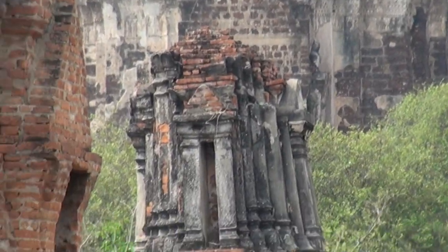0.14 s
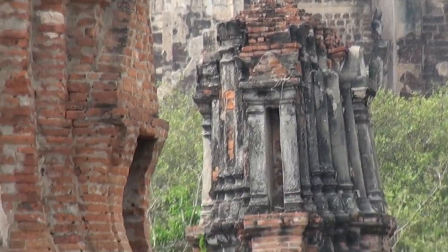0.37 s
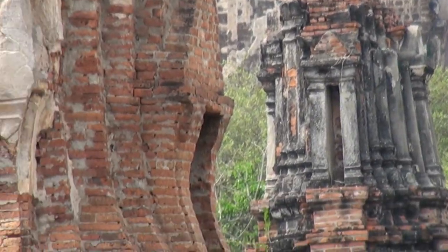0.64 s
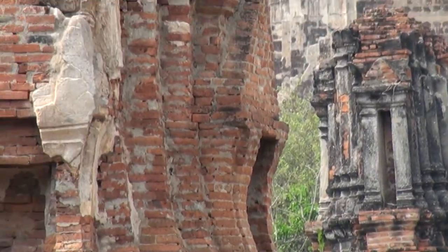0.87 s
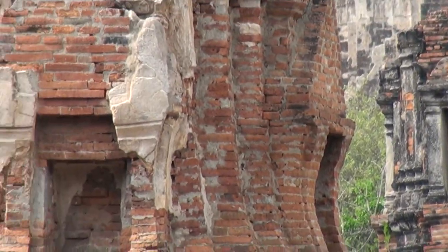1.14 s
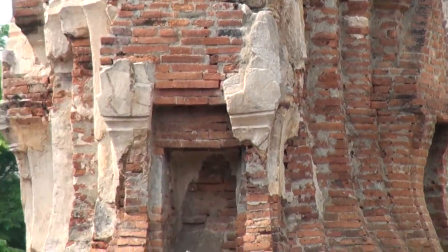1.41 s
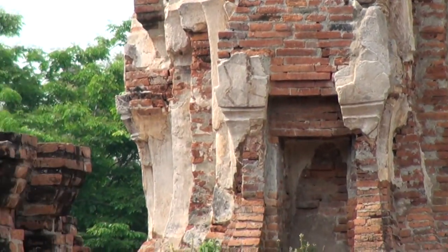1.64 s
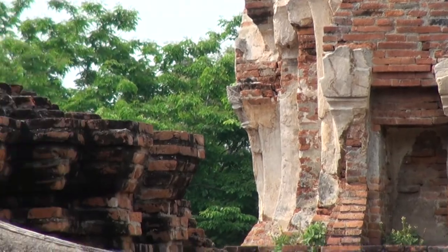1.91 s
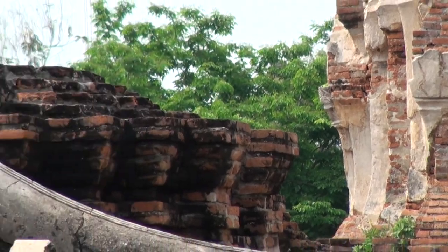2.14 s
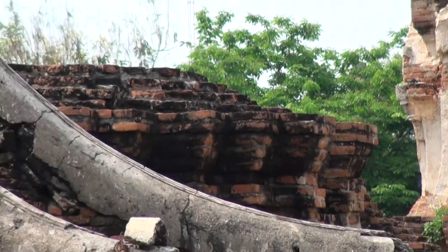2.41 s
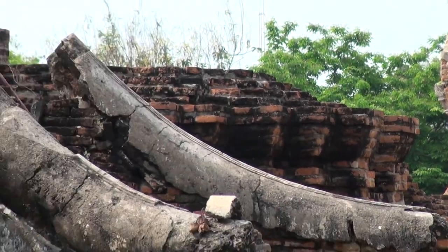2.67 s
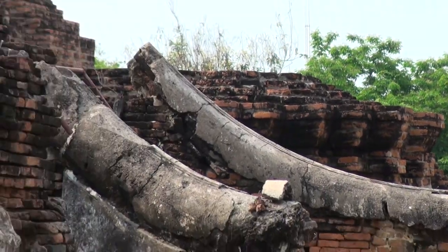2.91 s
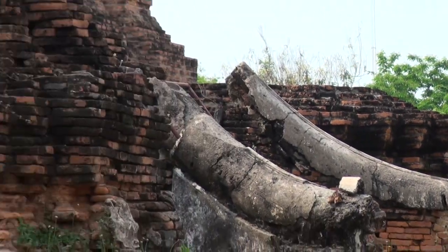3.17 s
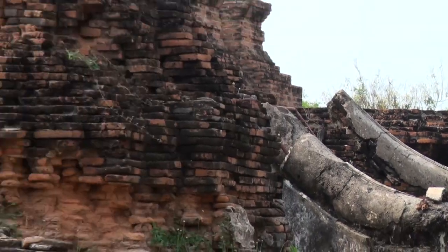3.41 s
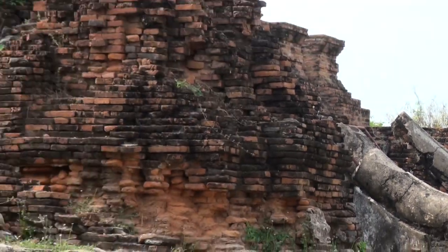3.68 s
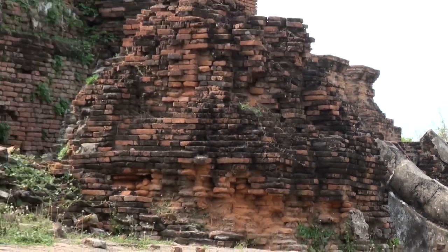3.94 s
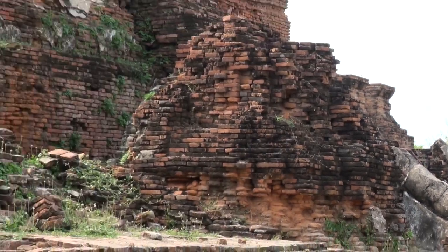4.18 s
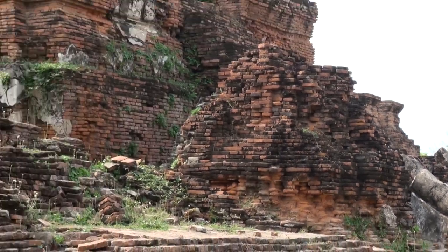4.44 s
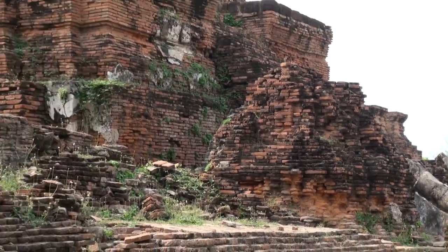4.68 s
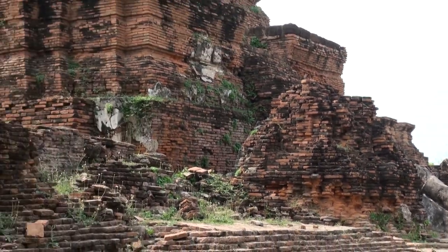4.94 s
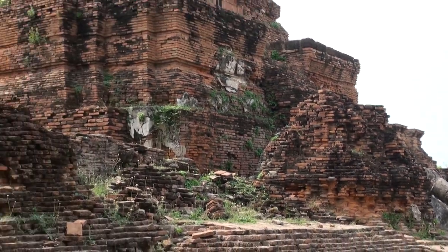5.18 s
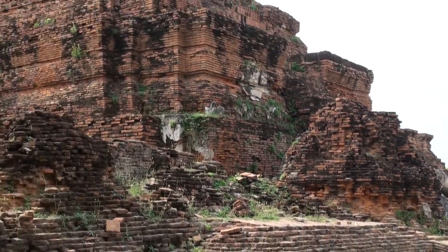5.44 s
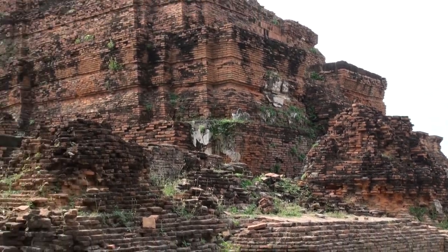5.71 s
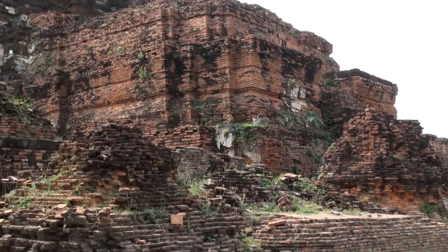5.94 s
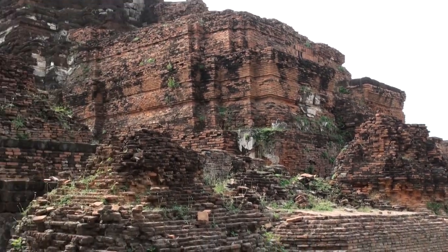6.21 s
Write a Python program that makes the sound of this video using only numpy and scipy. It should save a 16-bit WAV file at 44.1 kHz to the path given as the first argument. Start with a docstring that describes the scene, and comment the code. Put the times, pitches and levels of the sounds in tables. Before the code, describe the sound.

A quiet open-air place among brick ruins. Throughout, a very low breeze rumble swells unevenly on the microphone, with soft stereo hiss, a blurred wash of distant birds and faraway traffic that grows slightly; low engine tones waver, more noticeable from about 2.8 s. Faint buzzy warbles open, with rough little chirps at 0.5-0.7 s. A near bird sweeps upward at 0.9-1.0 s, then a fast trill falls from high and settles on a repeated pitch, 1.2-1.5 s. Harsh chirps cluster around 1.7 s. A short clear whistle peaks at 2.4 s. Distant warbles and chirps come at 3.0-3.7 s, leading into a louder whistle that leaps up and swoops down by 3.8 s. Sparse faint chips follow at 4.3 and 5.0 s. A louder rising call rings at 5.6 s, then dry ticks at about 5.85, 6.0 and 6.2 s. Walls add dull echoes and short tails.

```python
"""Birds call among brick ruins: two rising harmonic calls, two clear whistles, a falling trill and fainter
notes far off. Their voices are gliding tones and bands of noise, and the walls throw back echoes without their
low notes, and a tail. Distant traffic, made of shaped noise, drones and slowly grows; engines hum as low tones
that waver. A breeze rumbles on the microphone, under a soft hiss that differs between the channels."""
import sys
import numpy as np
from scipy import signal
from scipy.fft import rfft, irfft, next_fast_len
from scipy.io import wavfile
from scipy.ndimage import uniform_filter1d, map_coordinates

SR = 44100
rng = np.random.default_rng(int(sys.argv[2]) if len(sys.argv) > 2 else 0)


def undo_db(level):
    """Turn decibels back into plain size, where 20 dB means ten times bigger."""
    steps = np.asarray(level, float) / 20
    return 10 ** steps


def wrap_up_sound(samples):
    """Save the sound to the file named by the first command line argument, as 16-bit audio."""
    columns = np.atleast_2d(samples).T
    # keep every value between -1 and 1, then stretch to whole-number steps
    tamed = np.clip(columns, -1, 1)
    steps = np.round(tamed * 32767).astype(np.int16)
    wavfile.write(sys.argv[1], SR, steps)


N = 279241
TIME = np.arange(N) / SR


def unit(x):
    """Scale to rms 1."""
    return x / np.sqrt(np.mean(x ** 2) + 1e-20)


def along(points, hz):
    """Read (frequency, value) points on a log frequency axis."""
    f, v = np.transpose(points)
    return np.interp(np.log(hz + 1), np.log(f + 1), v)


def curves(rows, t=TIME):
    """Give one value per instant for each column after the time."""
    s, *cols = np.transpose(rows)
    return [np.interp(t, s, c) for c in cols]


def wobble(rate, size=N):
    """A smooth random curve with `rate` random knots a second."""
    knots = rng.standard_normal(int(size * rate / SR) + 4)
    return map_coordinates(knots, [np.arange(size) * rate / SR])


def span(start, length):
    """Times of the samples of one note (s)."""
    return start + np.arange(round(length * SR)) / SR


def add(track, start, sound, edge):
    """Lay a sound on a track, fading in and out over `edge` seconds."""
    k = np.arange(len(sound))
    fade = np.clip(np.minimum(k, k[::-1]) / (edge * SR), 0, 1)
    piece = track[round(start * SR):][:len(sound)]
    piece += (sound * fade)[:len(piece)]


def turns(hz):
    """Phase of a gliding tone, the glide smoothed over 2 ms."""
    return 2 * np.pi * np.cumsum(uniform_filter1d(hz, size=SR // 500)) / SR


def tone(hz, db):
    """A gliding sine whose rms follows a level in dB."""
    return np.sqrt(2) * undo_db(db) * np.sin(turns(hz))


def band(size, hz, width_hz):
    """Noise of rms 1 in a bell-shaped band."""
    f = np.fft.rfftfreq(size, 1 / SR)
    bell = np.exp(-2 * ((f - hz) / width_hz) ** 2)
    return unit(irfft(rfft(rng.standard_normal(size)) * bell, size))


# how far the left-right difference lies below the sum: (frequency [Hz], level [dB])
SIDE_LEVEL = [(30, -33), (80, -25), (170, -19), (350, -18), (700, -25), (1300, -28), (3000, -24)]


def rush(spectrum, patchy_db, side_level=SIDE_LEVEL):
    """Stereo noise of rms 1: a spectrum sets its colour, and smooth patches of random gain roughen it."""
    z = signal.stft(rng.standard_normal((2, N)), nperseg=512)[2]
    field = rng.standard_normal(z.shape[1:])
    field = uniform_filter1d(field, size=6, axis=0)
    field = uniform_filter1d(field, size=14, axis=1)
    pair = signal.istft(z * undo_db(patchy_db * unit(field)), nperseg=512)[1][:, :N]
    m = next_fast_len(N)
    hz = np.fft.rfftfreq(m, 1 / SR)
    balance = [np.ones(len(hz)), undo_db(along(side_level, hz))]
    mid, side = irfft(rfft(pair, m) * undo_db(along(spectrum, hz)) * balance, m)[:, :N]
    return unit(np.array([mid + side, mid - side]))


# strength of the breeze: (time [s], level [dB])
BREEZE_LEVEL = [(0, -26), (.37, -26), (.62, -27), (1.23, -23.5), (2.08, -25), (2.5, -31.5), (3.1, -23),
                (3.25, -29.5), (3.7, -23), (3.93, -27), (4.1, -21.5), (5.06, -26.5), (5.34, -19),
                (5.57, -31), (5.73, -24.5), (6.33, -28.5)]
# colour of the breeze, relative: (frequency [Hz], density [dB per Hz])
BREEZE_COLOUR = [(3, -62), (5, 0.5), (12, 3), (23, -7), (30, -6), (37, -21.5), (50, -47), (80, -120)]
# colour of the low rumble, relative: (frequency [Hz], density [dB per Hz])
RUMBLE_COLOUR = [(15, -120), (26, -11), (36, 1), (52, -1), (64, -2.5), (80, -13), (100, -11.5), (115, -18),
                 (150, -60), (250, -120)]


def breeze_and_rumble():
    """Very low noise swells as the breeze meets the microphone; a rumble follows it more gently."""
    breeze_db, = curves(BREEZE_LEVEL)
    rumble_db = -35.5 + 0.26 * (breeze_db - breeze_db.mean())
    breeze = undo_db(breeze_db) * rush(BREEZE_COLOUR, patchy_db=0.7)
    return breeze + undo_db(rumble_db) * rush(RUMBLE_COLOUR, patchy_db=0.87)


# colour of the engine drone, relative: (frequency [Hz], density [dB per Hz])
DRONE_COLOUR = [(62, -43), (105, -13.5), (160, -2.5), (210, -6), (300, -8.5), (400, -12), (520, -13.5),
                (680, -23), (1140, -120)]
# colour of the tyre noise, relative: (frequency [Hz], density [dB per Hz])
TYRE_COLOUR = [(330, -23), (560, -4), (813, -0.5), (2600, -13.5), (3380, -22.5), (5720, -120)]


def traffic():
    """Far engines and tyres, as two bands of noise; both grow as traffic nears, the tyres faster."""
    nearing_db = 0.5 * TIME  # dB per second
    drone = undo_db(-48.5 + 0.25 * nearing_db) * rush(DRONE_COLOUR, patchy_db=-0.14)
    tyres = undo_db(-51 + nearing_db) * rush(TYRE_COLOUR, patchy_db=0.8)
    return drone + tyres


# colour of the blurred birds, relative: (frequency [Hz], density [dB per Hz])
CHATTER_COLOUR = [(1120, 3.5), (1900, -11.5), (2480, -5.5), (3790, -4), (4130, -4), (5160, -9), (8000, -15),
                  (10400, -54), (17600, -120)]


def chatter():
    """Distant birds blur into a band of noise that wavers slightly in level."""
    return undo_db(-54 + 0.7 * wobble(2.5)) * rush(CHATTER_COLOUR, patchy_db=0.6)


# colour of the hiss, relative: (frequency [Hz], density [dB per Hz])
HISS_COLOUR = [(100, -20), (3000, -3), (9000, 2), (16000, 1)]


def hiss():
    """Steady bright noise, largely different in each channel."""
    return undo_db(-59) * rush(HISS_COLOUR, patchy_db=1.0, side_level=[(100, -3.5)])


# strength of the first engine: (time [s], level [dB])
HUM_LEVEL = [(0.0, -57), (1.74, -53), (1.83, -65), (2.2, -47), (2.5, -66), (2.82, -44), (3.37, -54.5),
             (3.75, -42.5), (4.21, -42), (4.32, -56), (4.71, -43.5), (4.83, -55.5), (6.08, -45),
             (6.33, -47.5)]
# a second, slower engine: (time [s], pitch [Hz], level [dB])
SLOW_ENGINE = [(2.9, 118.6, -64), (3.14, 117.3, -45), (3.48, 117, -51.5), (4.16, 120.3, -44.5),
               (4.4, 120.8, -65)]


def engine_hum():
    """Low firing tones from afar: one wavers in pitch and strength, a slower one in strength as it drifts."""
    db, = curves(HUM_LEVEL)
    hum = tone(132.1 + 2 * wobble(2) + 1.5 * wobble(10), db + 2 * wobble(8))
    start, end = SLOW_ENGINE[0][0], SLOW_ENGINE[-1][0]
    t = span(start, end - start)
    hz, db = curves(SLOW_ENGINE, t)
    add(hum, start, tone(hz, db + 1.5 * wobble(7.7, size=len(t))), edge=0.16)
    return hum


# echoes from rough walls: (delay [s], level [dB])
WALL_ECHOES = [(.004, -3.5), (.011, -15), (0.016, -35.5), (.025, -3.5), (.032, -5), (0.038, -22.5)]
# band that the crumbling brick sends back: (lowest [Hz], highest [Hz])
BRICK_BAND = [2600, 8700]
# how long the tail takes to fall by 60 dB: (frequency [Hz], time [s])
TAIL_TIME = [(1500, 0.28), (2300, 1), (3500, 0.58), (9000, 0.7)]


def ruins(x, walls_db, tail_db):
    """Direct sound, smeared wall echoes in a band from 2600 to 8700 Hz, and a diffuse tail that builds up, then
    dies at its own rate per pitch."""
    hz, t, z = signal.stft(rng.standard_normal(SR), SR, nperseg=256)
    decay = undo_db(-60 * t / along(TAIL_TIME, hz)[:, None])
    build_up = np.clip(t / 0.012, 0, 1)
    tail = signal.istft(z * decay * build_up, SR, nperseg=256)[1]
    walls = np.zeros(len(tail))
    for delay, db in WALL_ECHOES:
        smear = rng.standard_normal(SR // 125)  # bricks at many depths spread each echo over 8 ms
        add(walls, delay, undo_db(db) * smear / np.linalg.norm(smear), edge=0.00012)
    walls = signal.sosfilt(signal.butter(2, BRICK_BAND, "bandpass", fs=SR, output="sos"), walls)
    walls = walls * np.sqrt(SR / 2 / np.ptp(BRICK_BAND))  # make up for the energy the filter removes
    answer = undo_db(tail_db) * tail / np.linalg.norm(tail) + undo_db(walls_db) * walls
    answer[0] = 1  # the direct sound
    return signal.fftconvolve(x, answer)[:N]


def hoarse(hz, db):
    """A tone roughened by fast random changes of pitch and level."""
    rough_db = db + 1.5 * wobble(200, size=len(hz))
    return tone(hz * (1 + 0.016 * wobble(350, size=len(hz))), rough_db)


# pulsing warbles: (start [s], end [s], centre [Hz], width [Hz], level [dB])
WARBLES = [(.01, 0.372, 2800, 300, -61.5), (0.875, 1.22, 3040, 220, -62.5),
           (1.169, 1.255, 5250, 600, -61.5), (3.788, 3.89, 2495, 700, -56), (1.27, 1.317, 5850, 500, -64),
           (1.566, 1.656, 3100, 200, -58.5), (3.013, 3.142, 4340, 350, -64.5),
           (3.054, 3.11, 2900, 400, -53), (3.224, 3.56, 2780, 280, -60)]


def far_warbles():
    """Buzzy warbles smeared by distance: bands of noise that pulse 76 times a second."""
    out = np.zeros(N)
    for s, end, hz, width_hz, db in WARBLES:
        t = span(0, end - s)
        pulses = 1 + 0.31 * np.sin(2 * np.pi * 76 * t)
        add(out, s, undo_db(db) * unit(pulses * band(len(t), hz, width_hz)), edge=0.0041)
    return out


# gliding notes: (time [s], length [s], start [Hz], end [Hz], level [dB])
GLIDES = [(0.508, 0.053, 2500, 3130, -57), (.584, 0.013, 2600, 1950, -53),
          (0.602, 0.033, 4350, 2890, -56.5), (.592, .01, 3400, 2800, -55), (.598, .012, 2330, 1900, -55),
          (.612, .012, 3280, 2900, -54), (.632, 0.0071, 4200, 4050, -64), (0.615, 0.024, 2700, 1950, -53),
          (.647, 0.017, 2950, 2020, -50), (0.666, 0.025, 2760, 2160, -49.5),
          (1.701, 0.0039, 3120, 2600, -41), (1.706, 0.0097, 3030, 2900, -43),
          (1.703, 0.014, 4670, 3130, -50), (1.759, .027, 4000, 2200, -50), (1.783, .014, 3460, 2670, -52),
          (1.693, 0.0064, 2900, 4000, -53), (1.797, .012, 3080, 2300, -60), (1.8, 0.013, 2400, 2220, -62),
          (1.811, 0.0217, 3900, 3000, -57), (2.966, 0.043, 4600, 4680, -61),
          (3.019, 0.04, 3140, 2670, -52.5), (3.083, 0.043, 2930, 3170, -61),
          (3.075, 0.036, 2356, 2326, -50), (3.552, 0.0073, 3800, 3600, -56), (3.57, 0.015, 3790, 3750, -52),
          (3.605, 0.029, 3210, 2710, -47.5), (3.639, .015, 2890, 2800, -50), (3.657, .02, 2800, 2790, -48),
          (3.592, .017, 4780, 4830, -62), (3.68, 0.01, 4180, 4340, -45), (3.69, .006, 4400, 6800, -52),
          (2.995, .012, 4000, 3600, -60), (3.676, 0.033, 2120, 2420, -50), (5.315, 0.021, 3820, 3900, -65),
          (5.331, 0.01, 3200, 2900, -52), (5.531, .022, 2930, 2900, -58)]
# up-and-down notes: (time [s], length [s], top [Hz], level [dB])
ARCHED_NOTES = [(1.681, .011, 3950, -50), (1.736, 0.011, 3930, -47), (1.75, 0.02, 4150, -55)]


def far_notes():
    """Hoarse notes of other birds, gliding one way or arching up and down."""
    out = np.zeros(N)
    for s, length, start_hz, end_hz, db in GLIDES:
        u = span(0, length) / length
        hz = end_hz + (start_hz - end_hz) * (1 - u) ** 1.5  # moves fastest at its start
        add(out, s, hoarse(hz, db), edge=min(0.002, length / 4))
    foot_hz = 2730
    for s, length, top_hz, db in ARCHED_NOTES:
        u = span(0, length) / length
        add(out, s, hoarse(foot_hz + (top_hz - foot_hz) * np.sin(np.pi * u), db), edge=0.0016)
    return out


# harsh chips: (time [s], length [s], centre [Hz], width [Hz], level [dB])
HARSH_CHIPS = [(.572, .006, 4000, 4000, -54), (0.579, .09, 3280, 2200, -63),
               (1.698, 0.0067, 3300, 4400, -45), (1.705, 0.0076, 3780, 4000, -47),
               (1.693, .11, 3080, 2200, -58), (4.303, .0045, 5440, 6100, -50.5),
               (5.02, .0062, 5000, 7040, -55), (5.313, 0.029, 3420, 2800, -50),
               (5.6, .004, 2800, 4000, -48)]


def far_chips():
    """Harsh chips: bursts of broadband noise."""
    out = np.zeros(N)
    for s, length, hz, width_hz, db in HARSH_CHIPS:
        add(out, s, undo_db(db) * band(len(span(0, length)), hz, width_hz), edge=length / 4)
    return out


# short ticks: (time [s], start pitch [Hz], level [dB])
FALLING_TICKS = [(5.024, 3500, -49), (5.51, 3560, -43), (5.855, 4070, -42.5), (6.019, 4060, -43),
                 (6.179, 3940, -43.5)]


def far_ticks():
    """Each tick is a steep drop in pitch with a breathy puff of noise from halfway through."""
    out = np.zeros(N)
    tick_s, fall_hz, puff_s = 0.0055, 1350, 0.014
    for s, hz, db in FALLING_TICKS:
        add(out, s, hoarse(hz - fall_hz * span(0, tick_s) / tick_s, db), edge=tick_s / 4)
        puff = undo_db(db - 9.5) * band(len(span(0, puff_s)), 3300, width_hz=4200)
        add(out, s + tick_s / 2, puff, edge=puff_s / 4)
    return out


# thin steady notes high up: (time [s], length [s])
THIN_NOTES = [(5.847, .031), (5.882, .022), (5.909, .058)]


def far_thin_tone():
    """A faint, pure tone at 12170 Hz."""
    out = np.zeros(N)
    for s, length in THIN_NOTES:
        thin = np.sqrt(2) * undo_db(-67.5) * np.sin(2 * np.pi * 12170 * span(0, length))
        add(out, s, thin, edge=0.003)
    return out


# rising calls of a near bird: (time [s], pitch [Hz], effort [dB], beak closed [0-1])
RISING_CALLS = [
    [(.915, 1182, -53, 0), (.939, 1340, -46, 0.14), (.963, 1530, -35, 0.03), (.973, 1697, -45.5, 0.48),
     (.987, 1810, -46, .35), (.999, 2020, -54, 0.83), (1.005, 2080, -61.5, 0.98), (1.012, 2110, -62, 1),
     (1.02, 2000, -72, 1)],
    [(5.609, 1250, -50, 0), (5.614, 1266, -44.5, 0.1), (5.63, 1400, -43, 0.1), (5.648, 1548, -34.5, 0.17),
     (5.666, 1790, -29, 0.01), (5.68, 1887, -35, 0.2), (5.692, 1960, -35, 0.18), (5.706, 1893, -42.5, 0.2),
     (5.714, 1895, -47, 0.57), (5.722, 1860, -58, .4)],
]
# each call faces another way: (walls [dB], tail [dB])
RISING_ROOM = [(-15, -24), (-18, -10)]
# voice of each call: (share of pitch per step [fraction], upper harmonics at 1240 Hz [dB],
# their change per kHz of climb [dB], extra on harmonics 4-6 [dB])
RISING_VOICE = [(.008, 3, -18, -8), (.06, 1.5, -7, 0.5)]
# strength of harmonics 1-6 before throat and beak shape them: (level [dB])
OVERTONES = [0.5, 1, -11.5, -23, -20, -34]
# fixed resonances of the throat: (frequency [Hz], gain [dB])
THROAT_GAIN = [(1000, -1), (3000, -1), (4200, 3.5), (4700, 0.5), (5200, -3.5), (5800, 12.5), (6300, 6.5),
               (6900, -5), (7500, 1), (9000, -17), (12000, -16)]


def rising_bird():
    """A stack of harmonics sweeps up through the fixed throat; pitch and every harmonic flutter."""
    out = np.zeros(N)
    open_db, closed_db = -11.5, 21.5  # the fundamental with beak open and shut
    steps_per_s, step_s = 83, 5.688  # pitch steps, and the moment of one of them
    for call, (walls_db, tail_db), voicing in zip(RISING_CALLS, RISING_ROOM, RISING_VOICE):
        warble, upper_db, db_per_khz, edge_db = voicing
        t = span(call[0][0], call[-1][0] - call[0][0])
        hz, db, closed = curves(call, t)
        low_db = open_db + (closed_db - open_db) * closed
        high_db = upper_db + db_per_khz * (hz - 1240) / 1000
        high_db = high_db - 3 * closed  # the shut beak muffles them
        high_db = high_db - 0.38 * np.clip(db + 40.5, 0, None)  # they lag behind loud effort
        # the voice climbs in steps: it jumps up, then droops and fades a little
        step = (steps_per_s * (t - step_s)) % 1
        phase = turns(hz * (1 + 0.013 * wobble(184.4, size=len(t)) + warble * (0.5 - step)))
        stack = 0
        for k, level in enumerate(OVERTONES, start=1):
            flutter_db = 0.7 * k * wobble(218, size=len(t))
            gain_db = level + along(THROAT_GAIN, k * hz) + flutter_db
            gain_db = gain_db + (k == 1) * low_db + (k > 2) * high_db + (k > 3) * edge_db
            stack = stack + undo_db(gain_db) * np.sin(k * phase)
        fade_db = uniform_filter1d(55 * warble * step ** 4, size=SR // 500)
        voice = np.zeros(N)
        add(voice, t[0], np.sqrt(2) * undo_db(db - fade_db) * stack, edge=0.0014)
        out += ruins(voice, walls_db, tail_db)
    return out


# trill notes, each dropping onto its pitch: (time [s], pitch [Hz])
TRILL_NOTES = [(1.177, 5300), (1.191, 5300), (1.202, 5200), (1.217, 5170), (1.24, 4390), (1.263, 3790),
               (1.285, 3550), (1.309, 3480), (1.335, 3400), (1.361, 3430), (1.385, 3305), (1.413, 3310),
               (1.444, 3305), (1.474, 3310), (1.501, 3290)]


def triller():
    """Each note starts high and faint, settles on its pitch within a few ms and ends just before the next."""
    out = np.zeros(N)
    ends = [row[0] for row in TRILL_NOTES[1:]] + [1.535]
    for (s, hz), after in zip(TRILL_NOTES, ends):
        t = span(0, after - s - 0.0046)
        onset = np.exp(-(t / 0.0028) ** 2)
        # notes away from 3400 Hz are fainter, with the square of the distance
        db = -42 - 4.5 * ((hz - 3400) / 1000) ** 2 - 10 * onset
        drop_hz = np.clip(np.minimum(2.7 * (5400 - hz), 1.36 * (hz - 2850)), 200, 1000)
        add(out, s, tone(hz + drop_hz * onset, db), edge=0.0024)
    return out


# clear whistles: (time [s], pitch [Hz], level [dB])
WHISTLE_CALLS = [
    [(2.355, 3250, -65), (2.362, 3460, -47), (2.371, 3550, -49), (2.396, 3890, -34), (2.403, 3730, -35.5),
     (2.41, 3380, -44), (2.42, 3170, -47), (2.429, 3050, -58)],
    [(3.69, 3000, -41), (3.696, 5070, -39.5), (3.702, 6430, -43), (3.708, 6850, -44), (3.715, 6950, -48),
     (3.724, 6720, -46), (3.734, 6050, -42), (3.744, 4850, -30), (3.75, 4390, -29.5), (3.762, 3760, -30),
     (3.77, 3700, -34), (3.778, 3600, -36)],
]
# what the ruins answer to each whistle: (walls [dB], tail [dB])
WHISTLE_ECHO = [(-11, -12.5), (-16.5, -12.5)]


def whistler():
    """A pure gliding tone with a weak octave and a fainter twelfth; strain makes both swell near the end."""
    out = np.zeros(N)
    relaxed_db, strained_db = -26, -16.5  # the octave before and under strain
    for call, (walls_db, tail_db) in zip(WHISTLE_CALLS, WHISTLE_ECHO):
        t = span(call[0][0], call[-1][0] - call[0][0])
        hz, db = curves(call, t)
        strain = np.clip((t - t[-1] + 0.05) / 0.012, 0, 1)  # starts 50 ms before the end, grows for 12 ms
        octave_db = relaxed_db + (strained_db - relaxed_db) * strain
        octave_db = octave_db - 65 * np.clip(hz - 3900, 0, 800) / 1000  # thins out above 3900 Hz
        phase = turns(hz)
        overtones = np.sin(2 * phase) + undo_db(-16) * np.sin(3 * phase)
        whistle = np.sin(phase) + undo_db(octave_db) * overtones
        voice = np.zeros(N)
        add(voice, t[0], np.sqrt(2) * undo_db(db) * whistle, edge=0.00092)
        out += ruins(voice, walls_db, tail_db)
    return out


def scene():
    """Every bird stands at its own distance from the walls, over traffic, breeze and hiss."""
    background = breeze_and_rumble() + traffic() + chatter() + hiss()
    far = far_warbles() + far_notes() + far_chips() + far_ticks() + far_thin_tone()
    others = ruins(far, walls_db=-9, tail_db=-13)
    trill = ruins(triller(), walls_db=-21, tail_db=-28)
    return background + engine_hum() + others + rising_bird() + trill + whistler()


def low_pass(x):
    """Removes everything above the highest recorded frequency."""
    return signal.sosfilt(signal.butter(12, 16740, fs=SR, output="sos"), x)


def record(dry):
    """A microphone that keeps nothing above its band limit of 15760 Hz."""
    m = next_fast_len(N)
    in_band = np.fft.rfftfreq(m, 1 / SR) < 15760
    kept = irfft(rfft(dry, m) * in_band, m)[:, :N]
    return low_pass(kept)


dry = scene()
out = record(dry)
wrap_up_sound(out)
```